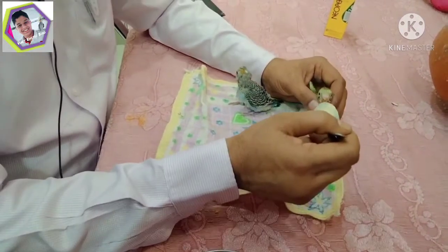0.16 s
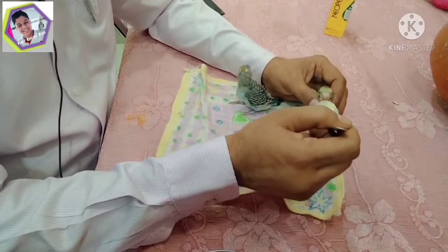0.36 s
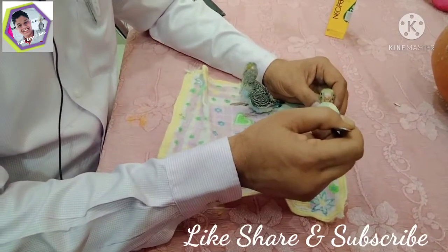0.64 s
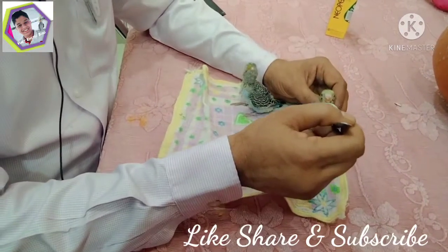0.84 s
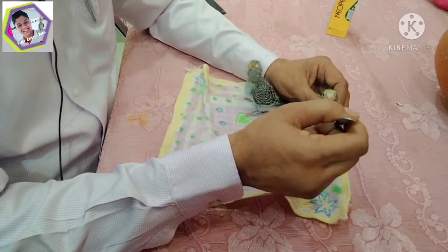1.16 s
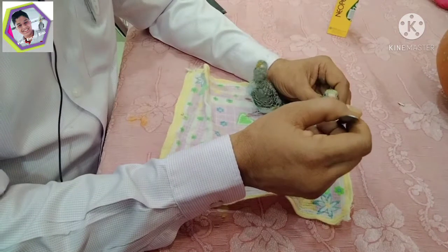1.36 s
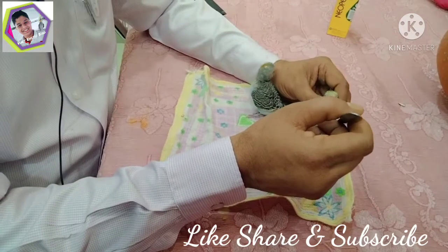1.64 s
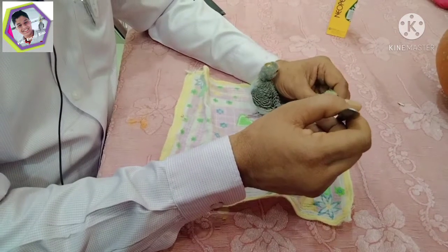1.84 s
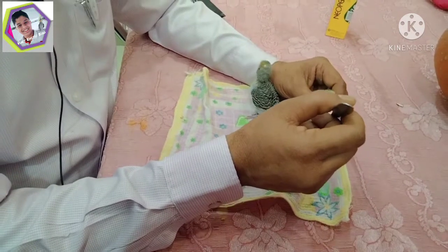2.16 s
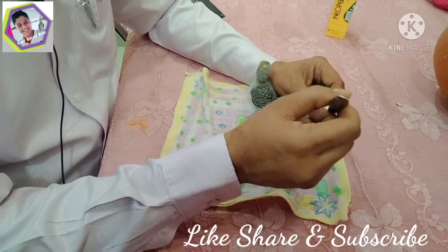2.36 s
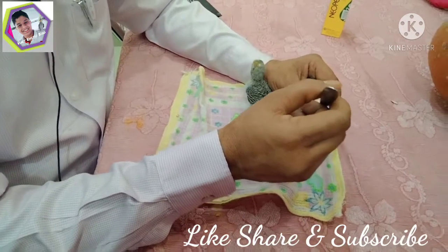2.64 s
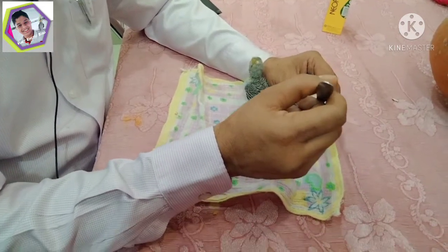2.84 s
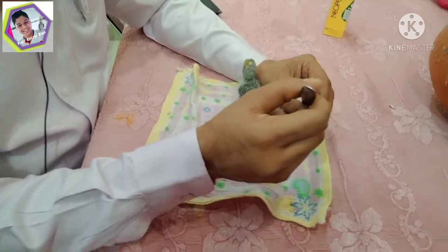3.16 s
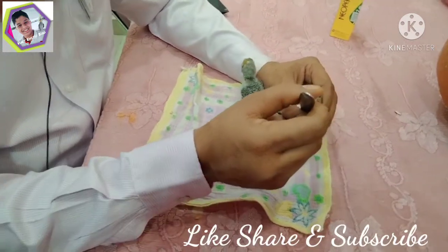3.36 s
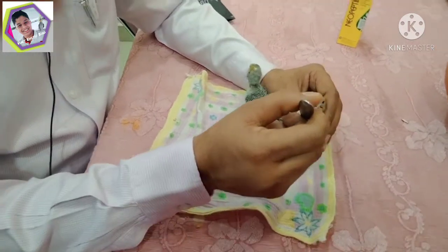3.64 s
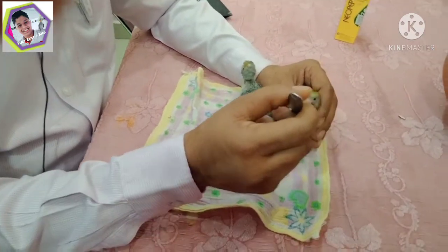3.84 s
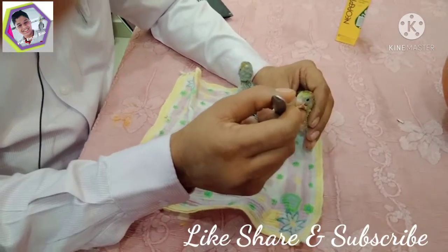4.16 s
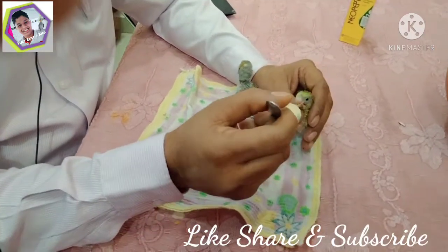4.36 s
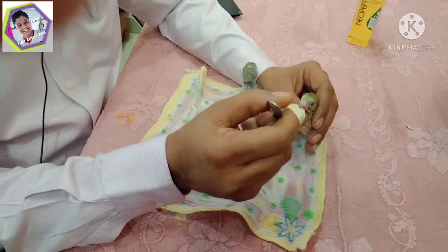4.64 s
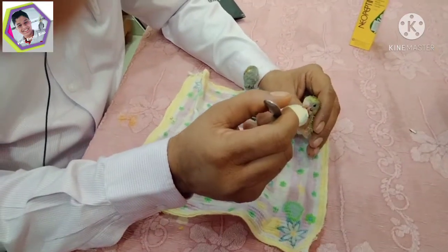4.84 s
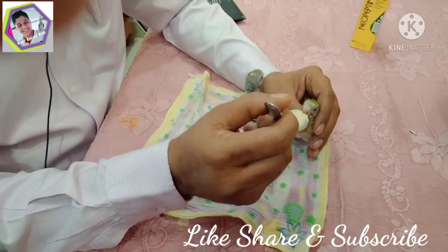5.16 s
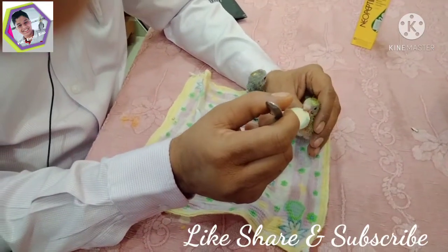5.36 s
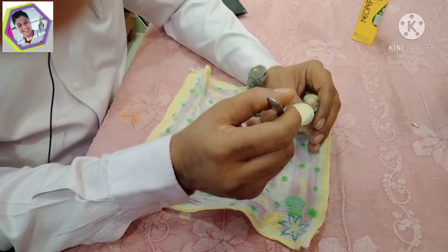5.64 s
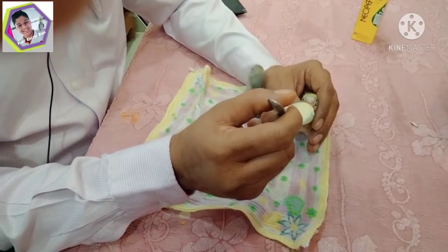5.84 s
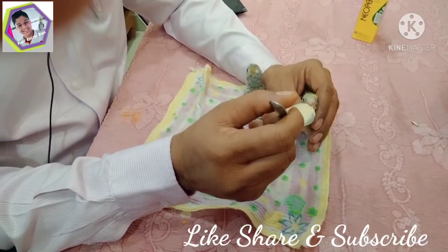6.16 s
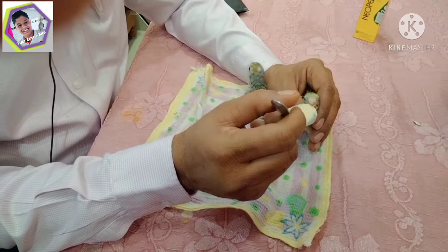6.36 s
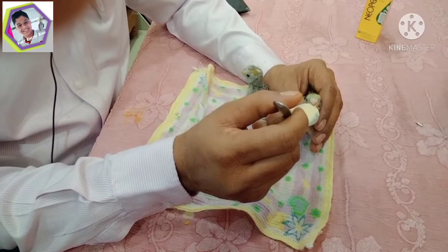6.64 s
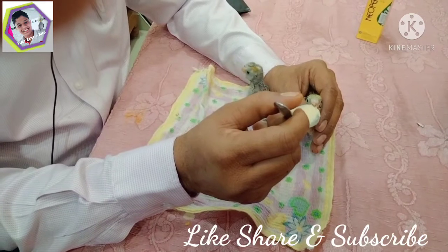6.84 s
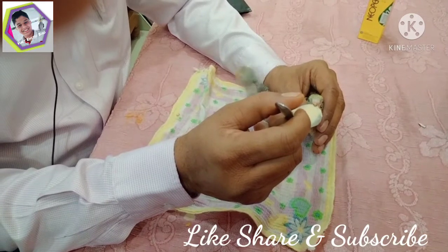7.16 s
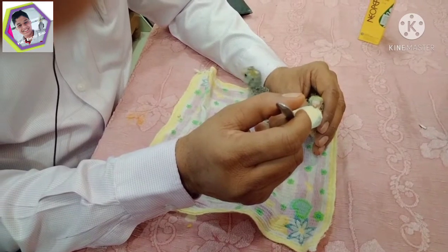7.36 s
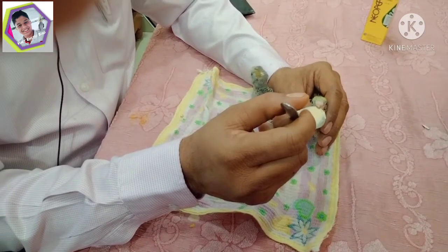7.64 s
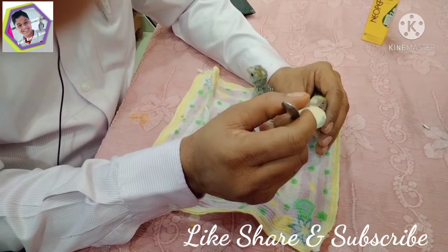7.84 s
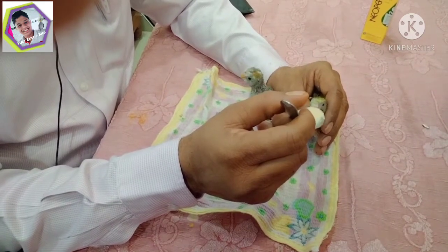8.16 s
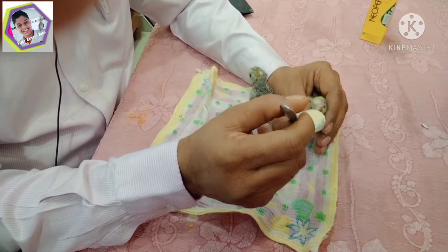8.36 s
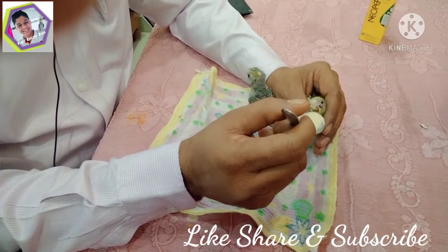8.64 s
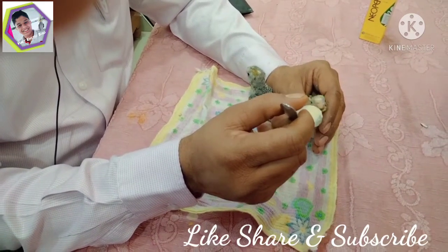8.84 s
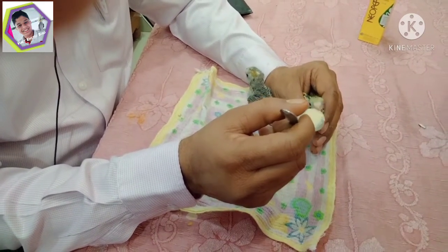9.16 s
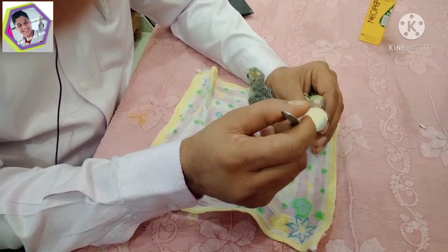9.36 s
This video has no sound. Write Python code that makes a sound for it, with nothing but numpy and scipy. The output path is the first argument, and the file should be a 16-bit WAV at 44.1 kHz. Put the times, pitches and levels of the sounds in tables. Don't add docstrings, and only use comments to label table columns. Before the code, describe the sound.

Close, quick chick cheeps swoop up and drop away, loud begging first, then softer calls among small beak and spoon knocks.

```python
import sys
import numpy as np
from scipy import signal
from scipy.io import wavfile
from scipy.ndimage import uniform_filter1d

SR = 44100
rng = np.random.default_rng(int(sys.argv[2]) if len(sys.argv) > 2 else 0)


def gain_from_decibels(decibels):
    exponent = np.asarray(decibels, float) / 20
    return 10 ** exponent


def wav_out(sig):
    wavfile.write(sys.argv[1], SR, np.round(np.clip(np.atleast_2d(sig).T, -1, 1) * 32767).astype(np.int16))


N = 418950
T = np.arange(N) / SR

# start_s, length_s, whistle_db, pitch_hz, octave_db (relative to the whistle)
HUNGRY = [
    (1.774, 0.27, -20.5, 2525, -6),
    (2.22, 0.17, -15.5, 2635, -19),
    (2.636, 0.19, -17, 2669, -18.5),
    (3.04, 0.19, -18.5, 2608, -14),
    (3.454, .173, -20, 2676, -18),
    (3.824, 0.15, -21.5, 2666, -15.5),
]
EAGER = [
    (0.088, 0.17, -20.5, 2700, -22.5),
    (4.62, 0.23, -25.5, 2546, -13.5),
    (5.086, .17, -25, 2703, -28),
    (6.82, .16, -29.5, 2602, -27.5),
]
PLAIN = [
    (5.439, 0.15, -31.5, 2622, -35.5),
    (5.804, .14, -31.5, 2610, -33.5),
    (6.148, 0.15, -30, 2620, -31.5),
]
RISING = [
    (.545, .12, -19.5, 2760, -27),
    (1.092, 0.14, -29, 2628, -27.5),
    (1.469, 0.15, -18.5, 2803, -29),
    (8.876, .13, -38, 2593, -30),
    (9.232, 0.28, -24, 2924, -28.5),
]
GULPING = [
    (0.674, 0.26, -29, 2557, -13),
    (1.611, 0.18, -27, 2632, -7),
    (4.371, .303, -35.5, 2330, -8.5),
]


def rms_one(x):
    return x / np.sqrt(np.mean(x ** 2) + 1e-20)


def band(x, low_hz, high_hz):
    return signal.sosfilt(signal.butter(2, [low_hz, min(high_hz, .45 * SR)], "band", fs=SR, output="sos"), x)


def room_air(patchy_db=3.0):
    # pitch_hz, level_db (per Hz)
    hum_colour = [(20, -13), (35, -4.5), (65, -7), (120, 0.5), (300, -2), (900, -10.5), (4000, -19),
                  (9000, -30)]
    hz, db = np.transpose(hum_colour)
    edges = 20 * 2 ** np.arange(0, 10.1, .5)
    white = rng.standard_normal((2, N))
    out = np.zeros(N)
    for k, (low, high) in enumerate(zip(edges, edges[1:])):
        flicker = np.interp(T, np.linspace(0, T[-1], 150), rng.standard_normal(150))
        level = np.interp(np.log(low * high) / 2, np.log(hz), db)
        out += gain_from_decibels(level + patchy_db * flicker) * band(white[k % 2], low, high)
    return gain_from_decibels(-55.5) * rms_one(out)


def screen_scan(spike_s=1.6e-5, on_db=-37.5, off_db=-36, ripple_db=-53, octave_db=1.5):
    # first_burst_s, bursts_per_s, burst_length_ms
    scans = [
        (.00048, 59.8505, 1.7),
        (5.24689, 59.85, .332),
        (6.14815, 60.7, 1.68),
        (6.8072, 59.85, 1.7),
        (8.29434, 59.85, .332),
    ]
    setting = np.searchsorted(np.array(scans)[1:, 0] - .002, T)
    first, rate, length = np.transpose(scans)[:, setting]
    since = (T - first + .001) % (1 / rate) - .001
    left = length / 1000 - since
    spikes = gain_from_decibels(on_db) * np.exp(-.5 * (since / spike_s) ** 2)
    spikes -= gain_from_decibels(off_db) * np.exp(-.5 * (left / spike_s) ** 2)
    phase = 2 * np.pi * 6950 * rate / 59.85 * left
    ripple = -np.cos(phase - .3) - gain_from_decibels(octave_db) * np.cos(2 * phase)
    running = (since > .26 * length / 1000 - 3e-5) * (left > 3e-5)
    return spikes + gain_from_decibels(ripple_db) * ripple * running / length ** .25


def bumps(events, width_s):
    s, *columns = np.transpose(events)
    marks = np.zeros((2, N))
    marks[:, (s * SR).astype(int)] = columns
    bell = np.exp(-.5 * (np.arange(-1400, 1401) / SR / width_s) ** 2)
    return signal.fftconvolve(marks, bell[None], "same")


def membrane_jolts():
    # peak_s, bend_share (of the pitch), swell_db twitches of the membrane, up or down,
    # some sharp as a yelp
    twitches = [(0.1503, 0.059, 3), (0.1816, -0.07, -7), (0.858, 0.093, 6.5), (1.2027, -0.095, -3),
                (1.2132, 0.08, 0.5), (1.5521, 0.092, 4), (1.6281, 0.14, 8.5), (1.6522, -0.098, -11.5),
                (1.6715, 0.076, 14), (1.7515, 0.16, 17), (1.821, 0.067, 15), (1.8549, 0.041, 5),
                (1.8715, 0.12, 15.5), (2.3166, -0.073, -10), (2.3392, -0.069, -6.5), (2.7412, -0.07, -4),
                (2.7928, 0.063, 4), (3.1346, 0.097, 4.5), (3.1562, 0.12, 4.5), (3.9081, 0.072, 4),
                (3.9369, -0.0784, -3.5), (4.5807, 0.023, 20), (4.6571, 0.068, 14), (4.7112, -0.092, 4),
                (5.1482, -0.12, -8), (5.2066, -0.053, -8), (5.2221, 0.062, 6), (6.2592, 0.031, -14),
                (8.1183, -0.11, -17.5), (9.265, 0.095, 5),
                (.246, 0.063, 3.5), (.682, 0.069, 7), (2.31, 0.12, 3), (2.33, 0.05, -3), (1.486, -0.038, -11),
             (2.227, -0.078, -10), (3.2, 0.072, -1), (3.531, 0.095, 3), (3.575, 0.047, 1),
             (4.353, 0.095, 2), (4.499, 0.12, 3), (5.878, 0.06, 2), (6.266, 0.027, 2), (6.905, 0.13, 7),
             (7.677, 0.22, -0.5), (0.813, -0.11, -1), (0.841, 0.0066, -3), (4.446, -.04, -8),
             (4.477, -0.063, -2), (4.529, -0.053, -12), (8.99, 0.09, 2), (9.301, 0.072, 0),
             (9.356, 0.077, 1), (9.364, 0.12, -2)]
    breaks = [(0.785, -0.31, -21), (0.801, -0.52, -15), (0.898, -0.7, -27), (1.149, -0.75, -8),
              (1.664, -0.42, -18.5), (1.695, -0.43, -36), (1.758, -0.55, -18.5), (4.304, -0.8, -19),
              (4.558, -0.45, -29)]
    quick_bends = [(0.1507, 0.069, 0.5), (0.1566, -0.064, 4), (0.5817, -0.059, -1), (0.6141, -0.08, -4),
                   (0.6231, 0.054, 2), (0.641, 0.045, 1.5), (0.6495, -0.084, -0.5), (0.6615, 0.037, 2),
                   (0.6849, -0.072, 3), (0.7144, 0.057, -2.5), (0.7433, -0.054, 3), (0.8171, -0.074, -6),
                   (0.9119, -0.053, -2.5), (1.1015, 0.083, 12), (1.1489, 0.097, -0.5),
                   (1.4732, -0.15, -7.5), (1.4806, 0.11, 4), (1.4896, -0.078, -4.5), (1.537, 0.049, -1.2),
                   (1.545, -0.039, -2.5), (1.559, -0.022, -1.5), (1.5949, -0.11, -2.5),
                   (1.6049, 0.05, -5.5), (1.716, 0.065, 3), (1.6966, 0.06, 8.0), (1.7086, -0.021, -9),
                   (1.7351, 0.067, 7.5), (1.764, 0.15, 5.5), (1.77, -0.04, 0.5), (1.7934, 0.066, 5),
                   (1.8543, 0.072, 0.5), (1.8942, 0.042, 5), (1.9176, -0.029, -6.5), (1.9336, -0.032, -3),
                   (1.9585, 0.038, 1.5), (2.0204, -0.015, -7.5), (2.2299, 0.09, 4.5), (2.2369, -0.083, 2),
                   (2.2429, 0.059, 1.6), (2.2489, -0.065, -5), (2.3576, 0.042, 3), (2.3811, 0.034, 5),
                   (2.6624, -0.048, -5), (2.6769, 0.049, 3), (2.7637, -0.068, -5.5), (2.7702, 0.033, 6),
                   (3.0536, 0.085, 4.5), (3.0615, -0.12, 0.5), (3.0715, 0.094, -3.5),
                   (3.1074, -0.066, -6.5), (3.1154, 0.077, 4.5), (3.1239, -0.051, -5),
                   (3.1409, -0.037, -6.5), (3.1937, 0.066, 3), (3.1992, -0.11, -8), (3.2057, 0.091, 3),
                   (3.2122, -0.07, -0.5), (3.4716, 0.068, 2.5), (3.4786, -0.13, -2), (3.4861, 0.1, -2),
                   (3.5295, -0.046, -0.5), (3.5525, 0.049, -2), (3.5691, 0.053, 2.9), (3.5769, -0.061, -3),
                        (3.6166, 0.0705, 6.5), (3.6253, -0.052, -10.5), (3.8546, 0.055, -2.5),
                        (3.8785, -0.086, -1), (3.8956, -0.083, -4), (3.9309, 0.099, 1), (3.9712, 0.05, 10),
                        (4.2277, 0.081, 1), (4.3152, -0.057, -2), (4.326, 0.062, 2.5), (4.3337, -0.041, -3.5),
                        (4.3522, -0.029, -7), (4.3575, 0.072, 2), (4.3667, -0.0084, -2), (4.3742, 0.085, 9),
                        (4.4482, 0.062, 6), (4.469, -0.054, -8), (4.4996, -0.067, -12), (4.58, 0.1, 2),
                        (4.5884, -0.095, 0), (4.633, -0.088, 2.5), (4.639, 0.061, 7), (4.6475, -0.085, -5.5),
                        (4.6565, 0.053, -2), (4.6823, -0.049, -5.5), (4.7113, 0.002, -5), (4.72, 0.075, 5),
                        (4.7565, 0.058, 0), (4.774, 0.05, 3.5), (4.815, -0.069, 0.5), (4.8333, 0.01, 10),
                        (4.844, -0.059, 2), (5.1073, -0.082, -3), (5.1984, 0.051, -1), (5.2292, -0.066, -3.5),
                        (5.581, 0.1, 7.5), (5.813, -0.09, -4.5), (5.9147, -0.049, -2.5), (5.938, 0.14, 1),
                        (6.159, -0.084, -8.5), (6.243, 0.061, 3.5), (6.2536, -0.06, -5), (6.2802, 0.059, -0.2),
                        (6.2889, -0.045, -3.5), (6.8804, -0.0466, -4), (6.894, -0.0021, -7), (6.9068, -0.053, 0),
                        (7.6691, 0.063, -6), (7.6768, -0.052, 0), (7.692, 0.05, 0), (7.719, -0.13, 7.5),
                        (8.0466, -0.097, -5), (8.1899, 0.083, -0.5), (8.9859, 0.057, -1.5),
                        (9.253, -0.0594, 3.5), (9.28, 0.036, 6.5)]
    leans = [(0.0908, 0.19, 0.5), (0.1272, 0.045, 3.5), (0.2125, 0.028, 1.5), (0.2559, 0.1, 9),
             (0.6645, 0.051, -4), (0.7698, 0.059, -2.5), (0.8007, 0.059, 2), (0.8416, 0.045, 1.5),
             (0.866, -0.049, 0.5), (0.897, 0.085, -2.5), (1.1718, 0.037, 4.5), (1.2242, 0.086, 4),
             (1.529, -0.077, 0.5), (1.5724, 0.042, 2), (1.6049, 0.096, 5.5), (1.6198, -0.044, -1),
             (1.6667, -0.044, -5.5), (1.776, 0.033, -5.5), (1.8229, 0.054, 4), (2.044, 0.14, 8),
             (2.2489, 0.066, 0.5), (2.3078, -0.036, -2.3), (2.7483, 0.019, 3), (2.7747, -0.035, -4),
             (2.8306, 0.07, 6), (3.043, 0.15, 3.5), (3.1768, 0.027, 2), (3.2182, -0.071, -9),
             (3.4581, 0.094, 7.5), (3.8323, 0.13, 7), (3.954, 0.036, 5), (4.3461, -0.0081, -5),
             (4.385, 0.057, -1), (4.5317, 0.04, 5), (4.5591, -0.045, -6), (4.6429, 0.061, 5),
             (4.6839, 0.063, 6.5), (5.0879, 0.13, 4.5), (5.1498, 0.079, 0.5), (5.1802, 0.05, 3),
             (5.258, 0.099, 8), (5.4531, -0.053, -2.5), (6.2972, -0.12, -15), (6.604, 0.09, 2.5),
             (6.835, 0.088, 5), (6.8629, 0.037, 0), (6.9826, 0.067, 4), (7.6746, -0.064, 9.5),
             (7.706, 0.045, 8), (8.2228, -0.031, -3)]
    swoops = [(s + .018, .13, 0) for s, *_ in HUNGRY[1:]]
    swoops += [(s + .013, .1, 1.5) for s, *_ in PLAIN]
    swoops += [(s + .011, .15, 4) for s, *_ in EAGER[::2]]
    swoops += [(s + .03, -.11, 1.5) for s, *_ in HUNGRY[1:]]
    sharp = bumps(twitches + swoops, .00217) + bumps(breaks, .0011)
    return sharp + bumps(quick_bends, .0027) + bumps(leans, .008)


def surges(rows, edge_s):
    out = np.zeros((3, N))
    for s, length, *change in rows:
        out += np.outer(change, np.clip(np.minimum(T - s, s + length - T) / edge_s, 0, 1))
    return out


def chick_efforts():
    # start_s, length_s, swell_db,
    # bend_share, beak_db (overtones)
    pushes = [(0.169, 0.057, 0.8, -0.035, 3), (0.623, 0.071, 1, 0.0068, 4.5),
              (1.09, 0.072, -4, -0.037, 3.5), (1.185, 0.04, 7.5, 0.016, -5.5),
              (1.561, 0.092, -0.5, -0.084, 6.5), (1.95, 0.14, 1, -0.022, -2), (2.3, 0.06, 3.5, 0.033, -4.5),
              (2.689, 0.058, -4, 0.026, 0.5), (2.778, 0.046, -2.5, -0.062, 3),
              (3.18, 0.058, 3.5, 0.041, -2), (4.304, 0.076, 14.5, 0.033, -1.5),
              (4.322, 0.056, 3, -0.017, 18.5), (4.688, 0.076, 3.5, 0.059, 3.5),
              (5.166, 0.088, 1.5, 0.011, 2.5), (6.817, 0.071, 1, -0.047, -4), (8.18, 0.032, -4, 0.061, -5),
              (8.952, 0.056, 11, 0.091, 2.5), (9.259, 0.086, 6.5, -0.041, 5),
              (9.349, 0.057, -1.5, 0.043, 7),
              (9.395, .035, -0.5, 0.016, -16), (9.42, 0.073, 1, 0.016, 1.5), (4.815, .05, -5, 0.023, -3.5),
              (6.51, 0.037, 2.5, 0.026, 2), (2.7, 0.041, -3.5, 0.03, -1.5), (6.2, 0.048, 3, -0.021, -6),
              (.09, .05, -2, -0.012, 1.5), (9.46, .07, -2, -0.062, 0)]
    # start_s, length_s, swell_db, bend_share, beak_db
    lunges = [(0.47, 0.0512, -16, -0.05, -4), (7.674, 0.029, 5.5, 0.027, 2.5),
              (7.674, 0.0416, 8, 0.0706, 7), (6.261, 0.029, 11, 0.0268, -2),
              (6.864, 0.0335, 8.5, 0.08, 3.5), (1.487, .05, 0.5, .07, 6), (2.69, 0.044, 5.5, .04, -0.5),
              (4.326, 0.066, 0.5, -0.0077, -1), (8.113, .055, -2, -0.044, 1.5)]
    # start_s, length_s, swell_db, bend_share, beak_db
    gulps = [(0.672, 0.1, -3.5, 0.05, 1.5), (.76, 0.039, 5, 0.054, 3), (0.795, 0.065, 2, -0.083, 0),
             (0.883, 0.038, 8.5, -0.024, -2.5), (1.598, .035, 10.5, 0.012, -21),
             (1.65, 0.05, 2.5, 0.015, 7), (1.763, 0.042, 2, -0.051, 10), (4.373, .075, -1, 0.08, 10),
             (4.43, 0.0612, 2.5, 0.022, 10), (4.5, .07, 1.5, -0.029, -5.5), (4.572, .03, 2, 0.075, -11),
             (4.595, .035, -4.5, 0.005, -3), (4.625, .035, -4, 0.053, -12)]
    edge_s = .01608
    return surges(pushes, edge_s) + surges(lunges, .0035), surges(gulps, edge_s)


def calls_in_order():
    # start_s, length_s, whistle_db, pitch_hz, octave_db
    soft = [(4.217, 0.15, -34.5, 2559, -31), (6.521, 0.082, -37, 2568, -23),
            (7.627, 0.092, -37.5, 2525, -25.5), (7.975, 0.042, -43.5, 2785, -28),
            (8.036, 0.19, -33, 2760, -26), (8.494, 0.025, -38.5, 2780, -44.5),
            (9.344, 0.19, -31.5, 2690, -22.5)]
    # start_s, length_s, whistle_db, pitch_hz, octave_db
    croaks = [
        (1.768, 0.015, -34.5, 1207, 0.65),
        (2.21, 0.017, -40.5, 1197, -1.5),
    ]
    # start_share, swoop_s, after_swoop_share, before_drop_share, closing_share
    glides = [
        (0.461, .02, .97, .98, 0.74),
        (.57, .022, .94, .98, 0.73),
        (.74, .021, .99, .97, 0.73),
        (.74, .01, 1.01, .96, 0.73),
        (.96, .008, .99, .98, .84),
        (1.03, .02, 1.01, .97, .82),
        (0.901, 0.0048, .99, 1.05, 1),
    ]
    # start_db, after_swoop_db, before_drop_db, closing_db, third_over_octave_db
    manners = [
        (-43, -4.5, -1.5, -21.5, -6.5),
        (-18.5, -5.5, -1.5, -15, -11),
        (-28, -4.5, -1.4, -9.5, -12.5),
        (-29, -0.5, -1.5, -13, 1),
        (-24, -3, -0.5, -7.5, -8),
        (-14, -2.5, 1.5, -9.5, -28),
        (-1.5, 3, 2, -9, 0),
    ]
    groups = zip([HUNGRY, EAGER, RISING, PLAIN, soft, GULPING, croaks], glides, manners)
    return sorted((cheep, *style) for rows, *style in groups for cheep in rows)


def outline(cheep, glide, manner, drop_s=.017):
    s, length, db, hz, _ = cheep
    start, swoop_s, early, late, close = glide
    swoop_end = min(swoop_s, 0.22 * length)
    drop_start = length - min(drop_s, 0.18 * length)
    times = s + np.array([0, swoop_end, length / 2, drop_start, length])
    return times, hz * np.array([start, early, 1, late, close]), db + np.insert(manner[:4], 2, 0)


def upper_overtones(phase, pitch, bent_pitch, third, shimmer, gulping, fall_db=-11):
    # pitch_hz, boost_db
    windpipe = [
        (7000, -.8),
        (9600, 4),
        (11200, -3),
        (13200, -5),
        (14700, 11.5),
    ]
    out = np.zeros(len(phase))
    for n in range(3, 7):
        db = third + np.interp(n * bent_pitch, *np.transpose(windpipe)) + fall_db * (n - 2.5)
        db = db + 3.9 * (n == 3) + 11.0 * gulping * (n == 4)
        tone = np.sin(n * phase) + .5 * shimmer[n % 3] * np.cos(n * phase)
        out += gain_from_decibels(db) * tone * (n * pitch < 16500)
    return out


def cheeps(rasp_db=-29, croak=0.28, croak_hz=2050):
    quiver = rms_one(band(rng.standard_normal((2, N)), 40, 95))
    shimmers = rms_one(band(rng.standard_normal((3, N)), 57, 230))
    rattles = rms_one(band(rng.standard_normal(N), 130, 500))
    grit = rms_one(band(band(rng.standard_normal(N), 2800, 7300), 2800, 7300))
    bend, swells = membrane_jolts()
    efforts = chick_efforts()
    flutter, ragged, half_db, swell_db, shimmer_db = .013, .4, -45, .5, .9
    out = np.zeros(N)
    for k, (cheep, glide, manner) in enumerate(calls_in_order()):
        s, pitches, levels = outline(cheep, glide, manner)
        at = slice(int(s[0] * SR), int(s[-1] * SR))
        t, shimmer, rattle = T[at], shimmers[:, at], rattles[at]
        swell = np.minimum(swells[at], 8.5)
        gulping = cheep in GULPING
        effort_db, strain, beak_db = efforts[gulping][:, at]
        pitch = np.interp(t, s, pitches) * (1 + strain)

        flat = cheep[3] - pitch
        loss_db = np.clip(0.7 * (flat - 201), 0, 4)
        level = effort_db - loss_db + 40 * np.log10(np.interp(t, s, gain_from_decibels(levels / 2)))

        flat = flat * np.where(t < s[1], 0.34, 1)
        second = cheep[4] + beak_db + np.minimum(0.0276 * flat, 18)
        second = np.minimum(second, 6)
        third = cheep[4] + beak_db - .3 * effort_db + manner[4] + np.minimum(.03 * flat, 9)

        trill = 1 + .4 * gulping + 0.396 * (cheep in HUNGRY[3:])
        trill += -0.17 * (cheep in RISING) + .4 * (cheep in PLAIN)
        shake = quiver[k % 2, at] * trill
        slack = np.clip((croak_hz - pitch) / 600, 0, 1)
        wander = flutter * (shake + .61 * shimmer[2]) + bend[at] + croak * slack * rattle
        bent_pitch = pitch * (1 + wander)
        phase = 2 * np.pi * np.cumsum(bent_pitch) / SR

        voice = gain_from_decibels(shimmer_db * shimmer[0] + swell) * np.sin(phase)
        octave = (1 + ragged * shimmer[1]) * np.sin(2 * phase)
        octave += ragged * quiver[1 - k % 2, at] * np.cos(2 * phase)
        voice += gain_from_decibels(second + 0.22 * swell) * octave
        voice += gulping * gain_from_decibels(rasp_db + second / 2) * grit[at] * shimmer[2]
        voice += upper_overtones(phase, pitch, bent_pitch, third, shimmer, gulping)
        uneven = gain_from_decibels(half_db + (second + 15) / 4) * shimmer[2] ** 2
        voice += uneven * (0.6 * np.sin(phase / 2) + np.sin(3 * phase / 2))

        edge = np.clip(np.minimum(t - s[0], s[-1] - t) / .0025, 0, 1)
        loudness = gain_from_decibels(level + swell_db * shake + 0.93 * slack * rattle)
        out[at] += np.sqrt(2) * loudness * edge * voice
    return out


def room(x, room_db=-11, bass_t60_s=0.4, treble_t60_s=0.36):
    t = T[:int(.7 * SR)]
    low, high = rng.standard_normal((2, len(t)))
    tail = band(low, 150, 2900) * gain_from_decibels(-60 * t / bass_t60_s)
    tail += band(high, 2800, 16000) * gain_from_decibels(-60 * t / treble_t60_s)
    tail *= np.clip((t - .003) / 0.0025, 0, 1)
    tail /= np.sqrt(np.sum(band(tail, 2300, 3100) ** 2) * SR / 1600)
    return gain_from_decibels(room_db) * signal.fftconvolve(x, tail)[:N]


def knocks(cycles=1.5, snap_s=0.0017):
    # start_s, peak_db, pitch_hz, snap_db (relative to the thud)
    touches = [(.337, -41, 663, -20), (3.6, -37, 570, -20), (4.018, -30.5, 432, -18),
               (5.591, -34.5, 1000, -15), (5.5945, -37, 800, -10), (5.599, -37, 700, -7),
               (5.6062, -21, 1090, -18), (5.647, -30.5, 1362, -9.5), (5.5125, -43, 1480, 2),
               (6.03, -35.5, 880, -13), (6.078, -38, 805, -11), (6.178, -39.5, 465, -4.5),
               (6.378, -42, 905, -4), (6.4645, -32.5, 570, -3), (6.927, -41, 1002, -12),
               (6.978, -29.5, 2200, -5.5), (7.417, -39.5, 750, -10), (.581, -33.5, 1420, 4),
               (7.076, -36.5, 805, -5), (8.265, -46, 599, 8), (8.424, -27, 3780, -10.5),
               (8.46, -37, 494, -8), (9.15, -44.5, 698, -2.5), (8.517, -31.5, 461, -27),
               (8.584, -36, 733, -9), (8.716, -49, 2510, 8), (9.402, -38, 774, -6)]
    out, t = np.zeros(N), T[:SR // 25]
    grit = band(rng.standard_normal((21, len(t))), 1000, 3400)
    for k, (s, peak_db, hz, snap_db) in enumerate(touches):
        thud = np.sin(2 * np.pi * hz * t) * np.exp(-t * hz / cycles)
        snap = gain_from_decibels(snap_db) * 3 * grit[k % len(grit)] * np.exp(-t / snap_s)
        start = int(s * SR)
        out[start:start + len(t)] += gain_from_decibels(peak_db) * (thud + snap)
    return out


def rustles():
    # start_s, length_s, level_db, lowest_hz, highest_hz
    strokes = [
        (0.477, 0.52, -56, 160, 1330),
        (6.573, 0.064, -58.5, 710.5, 1340),
        (7.35, .12, -58, 1700, 4520),
    ]
    out = np.zeros(N)
    for s, length, db, low_hz, high_hz in strokes:
        noise, lumps = rng.standard_normal((2, N))
        stroke = np.sin(np.pi * np.clip((T - s) / length, 0, 1)) ** .5
        lumpy = gain_from_decibels(db + 4.0 * rms_one(band(lumps, 4.7, 41)))
        out += lumpy * stroke * rms_one(band(noise, low_hz, high_hz))
    return out


def noise_gate(x, knee_db=-43.5, ahead_s=.012, smooth_s=.012):
    # since_loud_s, gain_db
    gate_shut = [
        (0, 0),
        (.04, -2),
        (.14, -8.5),
        (.32, -7),
    ]
    level_db = 10 * np.log10(uniform_filter1d(x ** 2, 660) + 1e-12)
    last_loud = np.maximum.accumulate(np.where(level_db > knee_db, T, -.3))
    gain_db = np.interp(T - last_loud, *np.transpose(gate_shut))
    return gain_from_decibels(uniform_filter1d(np.interp(T + ahead_s, T, gain_db), int(smooth_s * SR)))


def scene():
    near = cheeps() + knocks()
    return (near + room(near) + room_air() + screen_scan() + rustles())[None]


def roll_off(x):
    return signal.sosfilt(signal.butter(12, 15840, fs=SR, output="sos"), x)


def record(dry):
    top = signal.cheby2(16, 50, 16000, fs=SR, output="sos")
    mix = signal.sosfilt(top, dry * noise_gate(dry[0]))
    return roll_off(mix)


dry = scene()
out = record(dry)
wav_out(out)
```